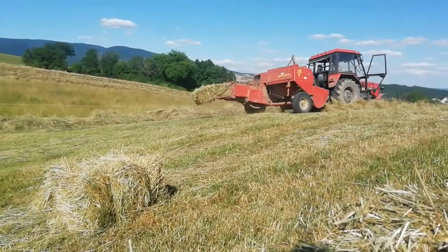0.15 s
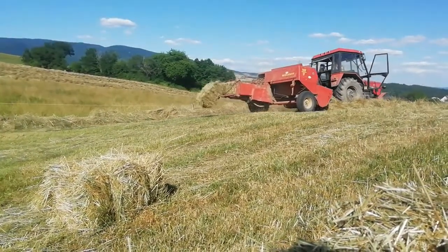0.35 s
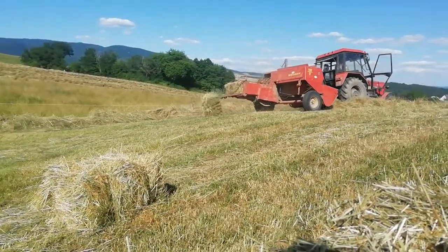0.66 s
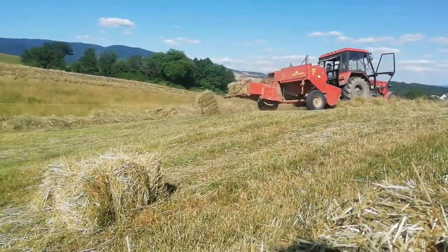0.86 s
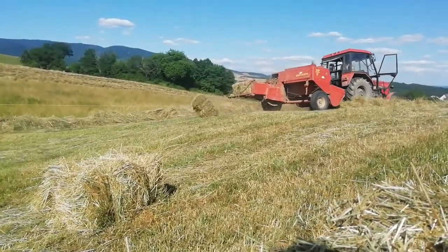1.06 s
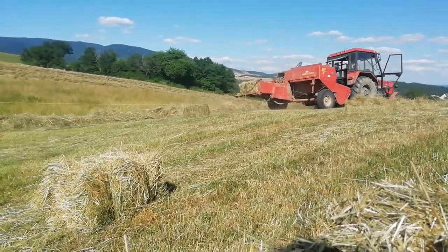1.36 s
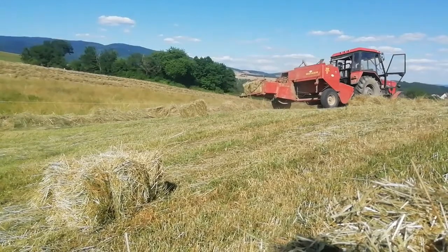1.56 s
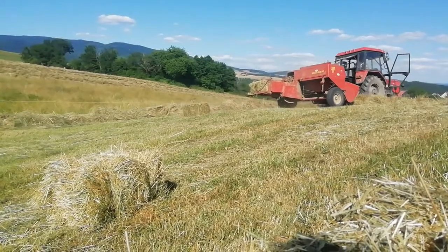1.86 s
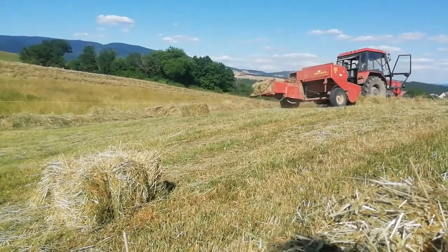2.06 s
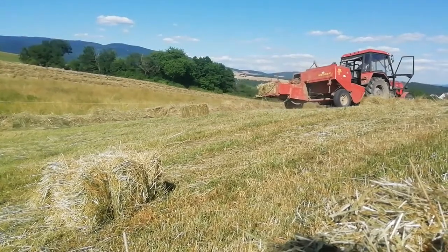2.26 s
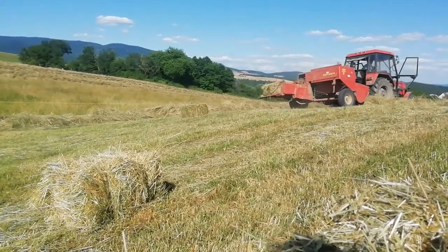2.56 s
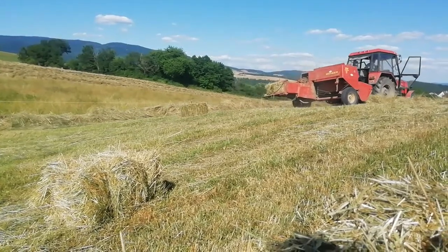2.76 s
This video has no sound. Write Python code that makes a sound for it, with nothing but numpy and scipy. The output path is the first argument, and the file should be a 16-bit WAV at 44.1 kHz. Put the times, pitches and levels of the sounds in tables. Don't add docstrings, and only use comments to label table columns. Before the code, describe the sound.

Rattling hay baler with dull booming plunger strokes, metallic clanks and hay hiss over a tractor's hum

```python
import sys
import numpy as np
from scipy import signal
from scipy.fft import rfft, irfft, next_fast_len
from scipy.io import wavfile

SR = 44100
rng = np.random.default_rng(int(sys.argv[2]) if len(sys.argv) > 2 else 0)


def generate_wav(sig):
    pcm = np.round(np.clip(np.atleast_2d(sig).T, -1, 1) * 32767).astype(np.int16)
    wavfile.write(sys.argv[1], SR, pcm)


def attenuation_scalar(level_db):
    decades = np.asarray(level_db, float) / 20
    return 10 ** decades


N = 128331
TIME_S = np.arange(N) / SR
RECEDE_DB_PER_S = -3


def noise(*rows):
    return rng.standard_normal((*rows, N))


def rms_one(x):
    return x / np.sqrt(np.mean(x ** 2) + 1e-20)


def at_hz(points, hz):
    points = np.array(points)
    return np.interp(np.log(hz + 1), np.log(points[:, 0]), points[:, 1])


def shaped(x, response):
    size = next_fast_len(N + SR // 10)
    hz = np.arange(size // 2 + 1) * SR / size
    return irfft(rfft(x, size) * response(hz), size)[..., :N]


def drift(rate_hz):
    r = np.exp(-80 * np.pi * rate_hz / SR)
    slow = signal.lfilter([1], [1, -2 * r, r * r], rng.standard_normal(N // 40 + 2002))[2000:]
    return np.interp(np.arange(N) / 40, np.arange(len(slow)), rms_one(slow))


def ring(clicks, hz, t60_s):
    r, w = attenuation_scalar(-60 / (t60_s * SR)), 2 * np.pi * hz / SR
    return signal.lfilter([0, np.sin(w)], [1, -2 * r * np.cos(w), r * r], clicks + 1e-18)


def swell(at_s, rise_s, fall_s):
    t = np.maximum(TIME_S - at_s, 0)
    shape = (1 - np.exp(-t / rise_s)) * np.exp(-t / fall_s)
    return shape / (shape.max() + 1e-12)


def pan(db):
    return attenuation_scalar(db * np.array([[.5], [-.5]]))


# start in seconds, length in seconds, level over idle in dB.
RATTLES = [(0, 0.055, 4.5), (0.117, .04, 4), (0.193, .17, 6), (0.646, 0.015, 3), (0.694, 0.13, 9),
           (0.961, 0.12, 7), (1.394, 0.1, 7), (1.524, 0.033, 7), (1.726, 0.19, 7), (2.07, 0.15, 4),
           (2.218, 0.11, 11), (2.477, 0.12, 10), (2.752, 0.074, 3), (2.875, 0.034, 6)]


def effort():
    idle_db, rise_s, fall_s = -45.5, 0.012, 0.06
    gates = []
    for start_s, length_s, db in RATTLES:
        rise = np.clip((TIME_S - start_s) / rise_s, 0, 1)
        gates.append(db * rise * np.exp(-np.maximum(TIME_S - start_s - length_s, 0) / fall_s))
    return idle_db + RECEDE_DB_PER_S * TIME_S + np.max(gates, axis=0)


# frequency in Hz, level per Hz in dB.
RUMBLE = [(13, -56), (22, -50), (38, -9), (54, -18), (76, -9), (139, -3), (263, -13.5), (390, -35),
          (460, -84), (600, -17.5), (1010, -120)]
# middle in seconds, half length in seconds, level over idle in dB.
STROKES = [
    (0.0, 0.048, 11.5),
    (0.393, 0.076, 11),
    (0.778, 0.066, 12),
    (1.064, 0.13, 4.5),
    (1.514, 0.1, 7),
    (1.877, 0.091, 8.5),
    (2.255, 0.077, 9),
    (2.638, 0.057, 5.5),
    (2.79, 0.068, 5.5),
]
# start in seconds, peak in dB, pitch in Hz.
BOOMS = [(0.01, -13.5, 146.8), (0.124, -13, 148.4), (0.065, -25, 201), (0.206, -18.5, 134.4),
         (0.244, -23.5, 200), (0.311, -10, 137.1), (0.351, -14, 165), (0.375, -9, 137), (0.585, -19, 116),
         (0.677, -15, 150), (0.721, -19, 127.5), (0.783, -26, 168.6), (1.017, -14, 147.7),
         (1.262, -20, 160.6), (1.394, -29, 129), (1.482, -23, 127), (1.628, -18.5, 156.7),
         (1.816, -12.5, 152.7), (1.738, -22, 120.8), (1.846, -14, 149.3), (1.887, -10, 122.2),
         (1.918, -15.5, 170.4), (1.961, -12.5, 120.4), (2.197, -16.5, 126), (2.282, -18, 245),
         (2.604, -23, 133.8), (2.527, -20, 139), (2.652, -15.5, 128.7), (2.75, -21, 192.6)]


def chamber(effort_db):
    rumble_db, shell_db, shell_follows = -34, -43, 0.35
    shell_hz, shell_width_hz = 258, 51
    boom_rise_s, boom_fall_s, boom_db = 0.028, 0.01, -4.5

    def rumble_colour(f):
        band = (f > 15) / (1 + (f / 470) ** 8) / (1 + (60 / (f + 1)) ** 2)
        return attenuation_scalar(at_hz(RUMBLE, f)) * band

    loads = [db * np.exp(-.5 * ((TIME_S - s) / half_s) ** 2) for s, half_s, db in STROKES]
    rumble_gain = attenuation_scalar(np.max(loads, axis=0) + rumble_db + 1.4 * drift(2.4))
    rumble = rumble_gain * rms_one(shaped(noise(), rumble_colour))
    shell = rms_one(shaped(noise(), lambda f: 1 / (1 + ((f - shell_hz) / shell_width_hz) ** 2)))
    shell = shell * attenuation_scalar(shell_db + shell_follows * (effort_db - effort_db.mean()))
    booms = np.zeros(N)
    for s, db, hz in BOOMS:
        tone = np.sin(2 * np.pi * hz * TIME_S + rng.uniform(0, 2 * np.pi))
        booms += attenuation_scalar(db + boom_db) * swell(s, boom_rise_s, boom_fall_s) * tone
    return rumble + booms + shell


# time in seconds, level in dB.
EXHAUST = [(0, -44), (.2, -36), (.44, -35.5), (.7, -36), (.87, -54), (.97, -32.5), (1.3, -36.5),
           (1.54, -48), (1.73, -48), (1.94, -30.5), (2.2, -44), (2.4, -48), (2.6, -38), (2.78, -37),
           (2.91, -38)]
# multiple of the firing rate, level against the firing tone in dB.
ORDERS_DB = [(2, -13), (3, -14), (4, -18)]


def engine():
    turn = 2 * np.pi * np.cumsum(53.1 + 0.08 * drift(1.7)) / SR
    tone = np.sin(turn)
    for multiple, db in ORDERS_DB:
        tone = tone + attenuation_scalar(db + 1.8 * drift(4.2)) * np.sin(multiple * turn + .5 * drift(3.2))
    level_db = np.interp(TIME_S, *np.transpose(EXHAUST))
    return np.sqrt(2) * attenuation_scalar(level_db + 1.5 * drift(3.4)) * tone


# pitch in Hz, level in dB, 60 dB decay in seconds, left over right in dB.
STEEL = [(505.7, -13, 0.087, 1.5), (787, -18, 0.082, -11), (1430, -8, 0.063, -4.5), (1530, -9.5, 0.1, -0.5),
         (1960, -6.5, 0.043, 11), (2600, -14, 0.024, 14.5), (3290, -16.5, 0.015, -9),
         (3680, -10, 0.045, -3), (3900, -5.5, .025, 6), (4450, -16.5, 0.026, 18.5), (4900, -11, 0.023, -6),
         (5820, -20.5, 0.085, 8)]


def clatter(effort_db):
    knocks_per_s, spread_db, damping = 1500, 1.5, 0.65
    level_db, ringing_db, knock_cut_hz = 2, -1.5, 14000
    sizes = attenuation_scalar(spread_db * np.minimum(rng.exponential(1, (3, N)), 5)) * rng.choice([-1, 1], (3, N))
    struck = rng.random((3, N)) < knocks_per_s * attenuation_scalar(2.0 * drift(15)) / SR
    knocks = sizes * struck + 0.54 * noise(3)
    rung = np.zeros((2, N))
    for hz, db, t60_s, pan_db in STEEL:
        part = ring(knocks[0] * noise(), hz, damping * t60_s)
        rung += attenuation_scalar(db + 2.24 * drift(11.0)) * pan(pan_db) * part
    gain = attenuation_scalar(effort_db + level_db)
    dry_knocks = rms_one(shaped(knocks, lambda f: 1 / (1 + (f / knock_cut_hz) ** 2)))
    return gain * dry_knocks, gain * attenuation_scalar(ringing_db) * rms_one(rung)


# start in seconds, peak in dB, pitch of the part hit in Hz, its 60 dB decay in seconds.
CLANKS = [(0.0143, -20.5, 3788, .07), (0.1321, -20.5, 3795, 0.071), (0.196, -28, 2017, 0.057),
          (0.2114, -20, 3860, .035), (0.279, -19.5, 3720, 0.078), (0.33, -26, 3650, .025),
          (0.361, -22, 1960, 0.098), (0.4956, -32, 3920, 0.044), (0.6538, -24.5, 2600, 0.047),
          (0.674, -31, 1460, 0.069), (0.7108, -26.5, 3610, 0.076), (0.739, -27.5, 1500, 0.062),
          (0.8021, -30, 3780, .06), (0.814, -19.5, 1430, .07), (0.845, -30, 1960, .05),
          (0.9702, -20.5, 1470, 0.17), (0.972, -25.5, 3900, 0.037), (1.0386, -21, 2600, 0.023),
          (1.05, -25.5, 1476, 0.069), (1.0879, -25, 4700, .03), (1.1534, -37, 3830, 0.044),
          (1.2306, -41, 1960, 0.061), (1.3206, -32, 2000, 0.17), (1.4144, -30, 1430, 0.14),
          (1.461, -35, 3900, 0.081), (1.5494, -50, 3800, .04), (1.734, -28.5, 3860, .025),
          (1.763, -32, 2600, .04), (1.799, -29.5, 1560, 0.29), (1.802, -25, 3720, 0.039),
          (1.865, -32, 2600, .035), (1.881, -29, 3800, .03), (1.903, -36, 3980, 0.061),
          (1.963, -41, 5700, .1), (1.975, -41, 4300, 0.065), (2.0063, -29.5, 2030, 0.13),
          (2.12, -34, 3680, 0.055), (2.2414, -34.5, 1530, 0.14), (2.3624, -36, 4360, .04),
          (2.4046, -34.5, 1970, 0.16), (2.455, -30.5, 1960, .14), (2.4868, -37, 3830, 0.055),
          (2.504, -24, 1480, 0.071), (2.525, -30, 1960, 0.069), (2.5546, -22.5, 3800, 0.029),
          (2.585, -31, 3770, .04), (2.6618, -36, 3830, 0.036), (2.742, -42, 6200, .05),
          (2.763, -38, 3840, 0.031), (2.805, -33, 2010, 0.051)]
CRACK_RISE_S = .0004


def clanks():
    bounce_s, bounce_db, strikes = 0.007, -2, 4
    clank_db, reach_db_per_octave = -20, 6
    crack_db, crack_db_per_octave, crack_s = 4, 4.5, .006
    crack_low_hz, crack_top_hz = 2500, 5940
    first_s, first_db, blow_hz, _ = np.transpose(CLANKS)
    late_s = np.cumsum(rng.uniform(0.66, 1.2, (len(CLANKS), strikes)), axis=1) * bounce_s
    hit_s = (first_s[:, None] + late_s - late_s[:, :1]).ravel()
    hit_db = (first_db[:, None] + bounce_db * np.arange(strikes)).ravel()
    hit_hz = np.repeat(blow_hz, strikes)
    ringing = np.zeros((2, N))
    for hz, level_db, t60_s, pan_db in STEEL:
        away_db = reach_db_per_octave * abs(np.log2(hz / hit_hz))
        chance_db = rng.normal(0, 1, len(hit_s))
        clicks = np.zeros(N)
        clicks[(hit_s * SR).astype(int)] = attenuation_scalar(hit_db + clank_db + 0.096 * level_db - away_db + chance_db)
        ringing += ring(clicks, hz, t60_s) * pan(pan_db)
    bursts = np.zeros(N)
    for s, db, hz in zip(first_s, first_db, blow_hz):
        small_db = crack_db_per_octave * np.log2(hz / crack_top_hz)
        bursts += attenuation_scalar(db + crack_db + small_db) * swell(s, CRACK_RISE_S, crack_s)
    grit = shaped(noise(3), lambda f: f / (f + crack_low_hz) / (1 + (f / crack_top_hz) ** 6))
    return bursts * grit, ringing


# start in seconds, peak in dB, pitch in Hz.
JINGLES = [
    (0.0936, -57, 13500),
    (0.2752, -56, 13700),
    (0.7092, -44, 13200),
    (1.027, -49, 13400),
    (1.0843, -65, 13300),
    (1.2185, -50.5, 14100),
    (1.4675, -51, 13640),
    (1.9633, -56, 13600),
    (2.3395, -56, 13200),
    (2.8877, -57, 13700),
]


def pings():
    ping_db, rattle_s, strike = -32.5, 0.015, 10
    twin_ratio, twin_db = 1.035, -10
    jingle_db, jingle_rise_s, jingle_rattle_s, jingle_t60_s = -18, 0.0015, 0.019, 0.043
    pans = [(hz, pan_db) for hz, _, _, pan_db in STEEL]
    rattle = noise()
    out = np.zeros((2, N))
    for s, db, hz, t60_s in CLANKS:
        push = swell(s, CRACK_RISE_S, rattle_s) * rattle
        push[int(s * SR)] += strike
        twin = attenuation_scalar(twin_db) * ring(push, hz * twin_ratio, 0.47 * t60_s)
        out += attenuation_scalar(db + ping_db) * (ring(push, hz, t60_s) + twin) * pan(at_hz(pans, hz))
    for s, db, hz in JINGLES:
        push = swell(s, jingle_rise_s, jingle_rattle_s) * rattle
        out += attenuation_scalar(db + jingle_db) * ring(push, hz, jingle_t60_s) * np.array([[1], [.15]])
    return out


def ticks(effort_db):
    ticks_per_s, tick_s, tick_hz, tick_db = 45, .004, 3800, -4.5
    rate = ticks_per_s * attenuation_scalar(effort_db - effort_db.mean())
    born = (rng.random(N) < rate / SR) * attenuation_scalar(rng.normal(0, 4, N))
    bursts = signal.lfilter([1], [1, -np.exp(-1 / (tick_s * SR))], born)
    grit = shaped(bursts * noise(3), lambda f: 1 / (1 + np.log2((f + 1) / tick_hz) ** 2) ** 2)
    return attenuation_scalar(effort_db + tick_db) * rms_one(grit)


# start in seconds, peak in dB.
SWISHES = [(0.049, -32.5), (0.2119, -35.5), (0.275, -29), (0.329, -41), (0.498, -37), (0.647, -31.5),
           (0.7103, -48), (0.8084, -39), (0.8594, -66), (0.9712, -32), (1.029, -34), (1.228, -38),
           (1.3897, -32.5), (1.4686, -36), (1.581, -35), (1.7325, -36), (1.9594, -39), (2.173, -36),
           (2.221, -39), (2.2682, -37), (2.335, -32), (2.5007, -52), (2.7, -38), (2.886, -36.5)]
# frequency in Hz, level per Hz in dB.
HISS = [(1500, -28.5), (4000, 0), (5600, 1.5), (7500, 8.5), (10500, 6.5), (13000, -1), (15000, -4)]
# Centres, in Hz, of the bands in which the hiss drifts separately.
HISS_BANDS_HZ = [1500, 3000, 4500, 6000, 7300, 8500, 9700, 11000, 12500, 14000, 15500]


def insects_and_hay(effort_db):
    hiss_db, hiss_follows, patchy_db = -36.5, 0.37, 0.5
    swish_db, swish_rise_s, swish_fall_s = -2, 0.0018, .025
    level = attenuation_scalar(hiss_db + hiss_follows * (effort_db - effort_db.mean()))
    for s, db in SWISHES:
        level = level + attenuation_scalar(db + swish_db) * swell(s, swish_rise_s, swish_fall_s)
    grain, patches = noise(3), np.zeros((3, N))
    for tent in np.eye(len(HISS_BANDS_HZ)):
        band = shaped(grain, lambda f: attenuation_scalar(at_hz(HISS, f)) * np.interp(f, HISS_BANDS_HZ, tent))
        patches += attenuation_scalar(patchy_db * drift(3.7) + 3.44 * drift(73)) * band
    return level * rms_one(patches)


# pitch in Hz, width in Hz, level in dB.
WHIRR = [
    (1398, 160, -52),
    (1530, 150, -56.5),
    (1999, 69, -56),
]


def whirr():
    hum = np.zeros(N)
    for hz, width_hz, db in WHIRR:
        t60_s = np.log(1000) / np.pi / width_hz
        hum += attenuation_scalar(db + 1.7 * drift(3.3)) * rms_one(ring(noise(), hz, t60_s))
    return attenuation_scalar(.5 * RECEDE_DB_PER_S * TIME_S) * hum * pan(3)


def wind():
    rumble = rms_one(shaped(noise(2), lambda f: f / 120 / (1 + (f / 120) ** 3)))
    return attenuation_scalar(-55.5 + drift(0.49)) * rumble


# frequency in Hz, gain in dB.
LEFT_PORT = [(430, -6.5), (1400, 7), (4000, -1.5), (6400, -7), (7550, -5), (8300, 6), (9500, 2),
             (10300, -10.5)]
RIGHT_PORT = [(430, 7), (1400, 3.5), (3800, -2.5), (5000, -8.5), (6500, -20.5), (9000, -26), (10300, -29),
              (12000, -28)]
TOP_FALL_DB_PER_KHZ = [-2.5, -7]
# lag in seconds, share, phase turn in radians, dulled above in Hz.
ECHOES = [(.00166, .6, 1.96, 4400), (.0017, .45, 2.1, 2880)]
# frequency in Hz, share of power common to both.
LIKENESS = [(400, 1), (1500, 0.99), (3000, 0.11), (8000, 1), (11000, 0.047)]


def ports(paths):
    def alike(f):
        return np.clip(at_hz(LIKENESS, f), 0, 1)

    out = []
    for colour, fall, echo, scattered in zip((LEFT_PORT, RIGHT_PORT), TOP_FALL_DB_PER_KHZ, ECHOES, paths[1:]):
        lag_s, share, turn, dull_hz = echo

        def port(f):
            top_db = fall * np.maximum(f - colour[-1][0], 0) / 1000
            bounce = share * np.exp(1j * (turn - 2 * np.pi * f * lag_s)) / (1 + (f / dull_hz) ** 2)
            low_cut = (f / 350) ** 2 / (1 + (f / 350) ** 2)
            return attenuation_scalar(at_hz(colour, f) + top_db) * (1 + bounce) * low_cut

        common = shaped(paths[0], lambda f: port(f) * np.sqrt(alike(f)))
        out.append(common + shaped(scattered, lambda f: port(f) * np.sqrt(1 - alike(f))))
    return np.array(out)


def left_delay(f):
    lag_s, turn_rad = .00004, 0.21
    return np.exp(-1j * (2 * np.pi * f * lag_s + turn_rad * f / (f + 90)))


def scene():
    effort_db = effort()
    knocks, rung = clatter(effort_db)
    cracks, struck = clanks()
    bright = ports(knocks + cracks + insects_and_hay(effort_db) + ticks(effort_db))
    left, right = chamber(effort_db) + engine() + rung + struck + pings() + whirr() + bright
    return np.array([shaped(left, left_delay), right]) + wind()


def band_limit(x):
    return signal.sosfilt(signal.butter(12, 15680, fs=SR, output="sos"), x)


def record(dry):
    return band_limit(dry)


dry = scene()
out = record(dry)
generate_wav(out)
```